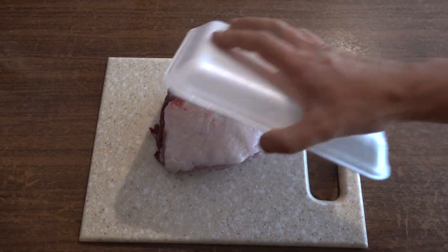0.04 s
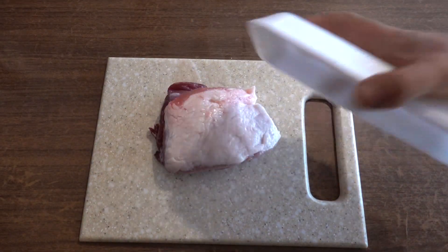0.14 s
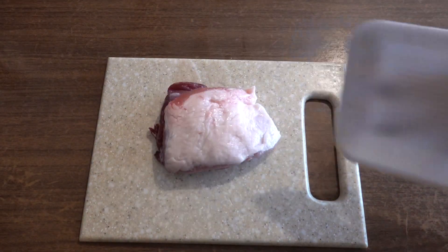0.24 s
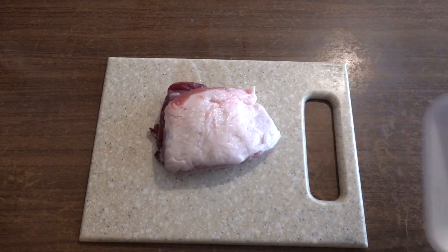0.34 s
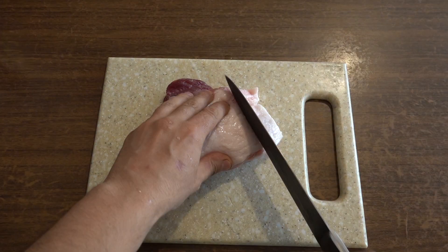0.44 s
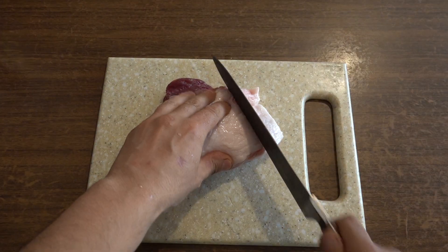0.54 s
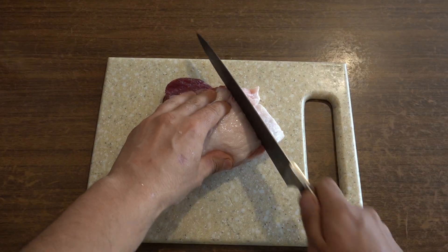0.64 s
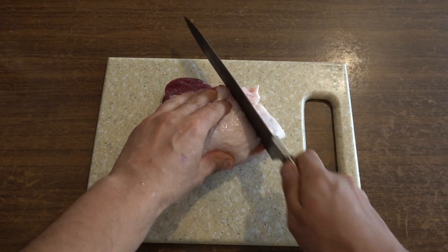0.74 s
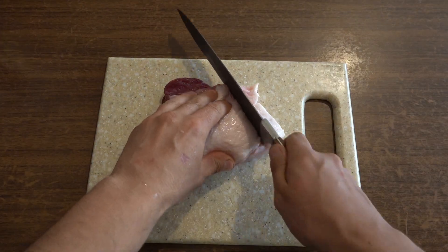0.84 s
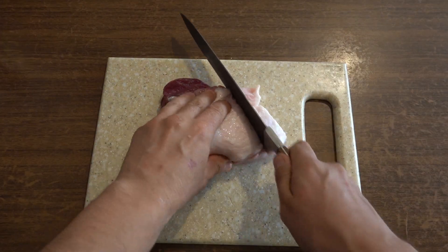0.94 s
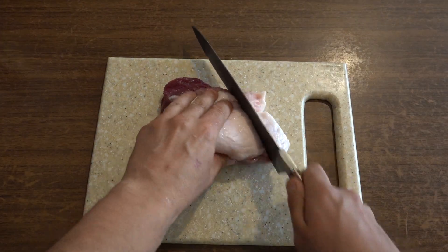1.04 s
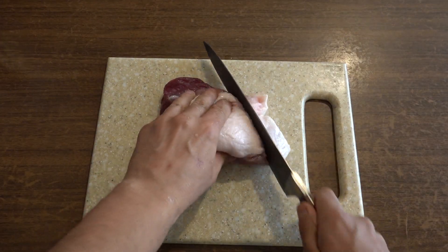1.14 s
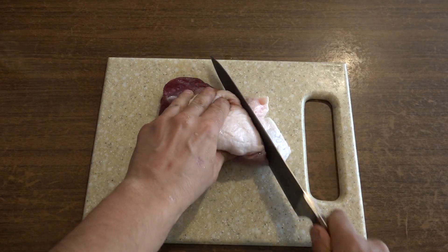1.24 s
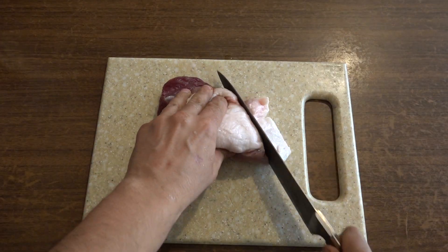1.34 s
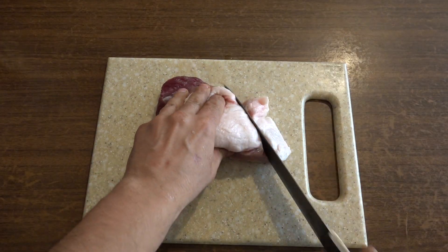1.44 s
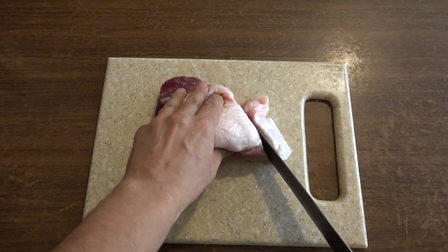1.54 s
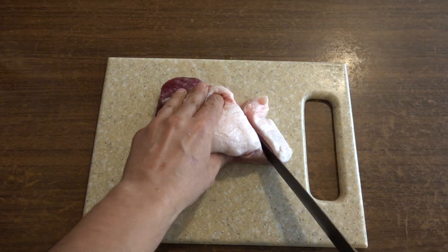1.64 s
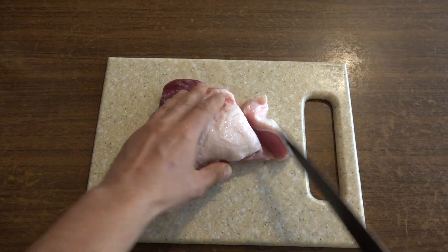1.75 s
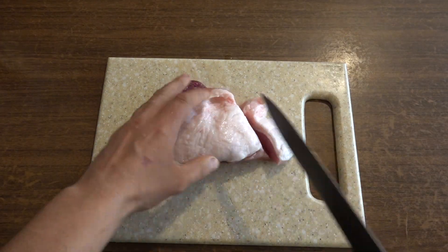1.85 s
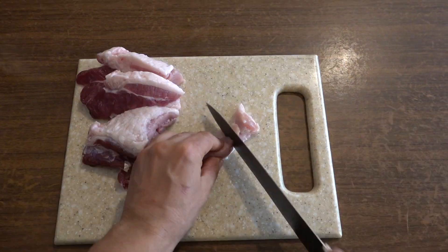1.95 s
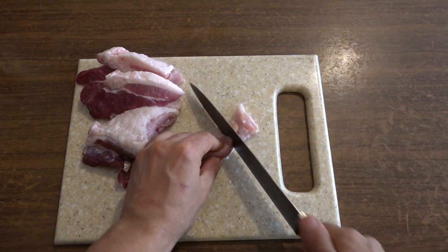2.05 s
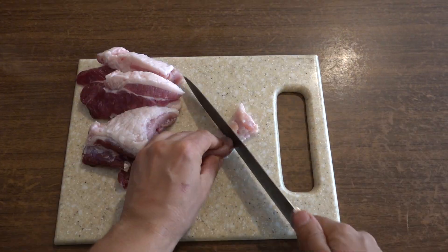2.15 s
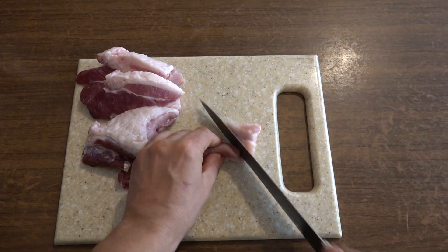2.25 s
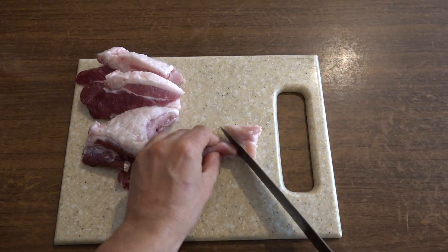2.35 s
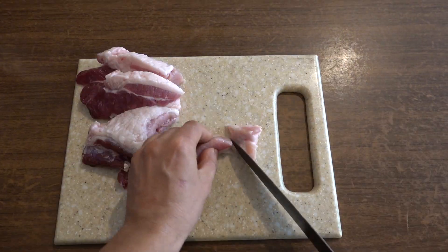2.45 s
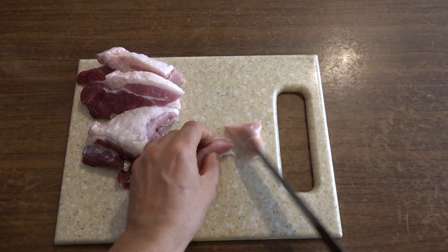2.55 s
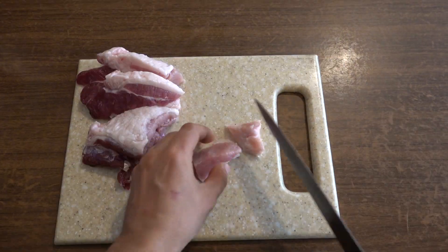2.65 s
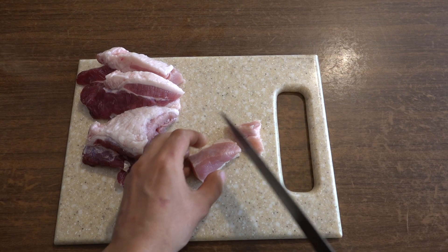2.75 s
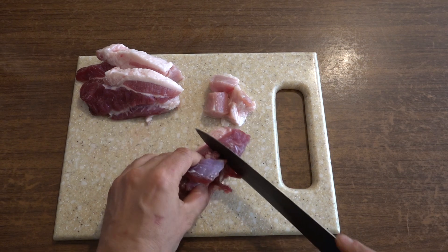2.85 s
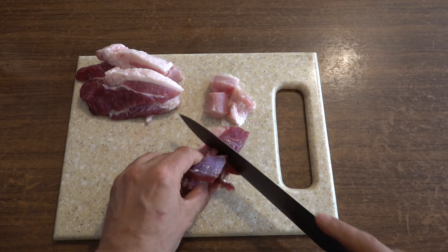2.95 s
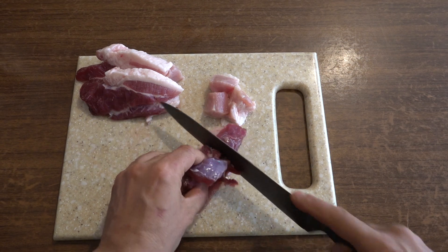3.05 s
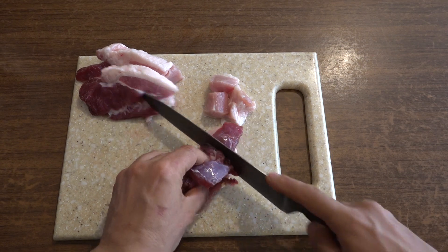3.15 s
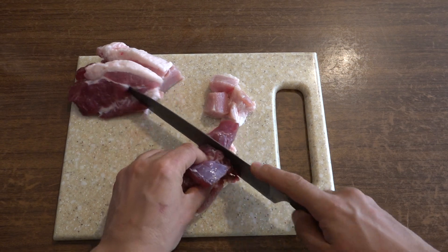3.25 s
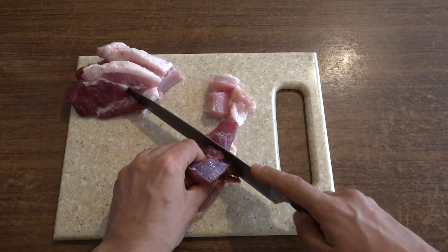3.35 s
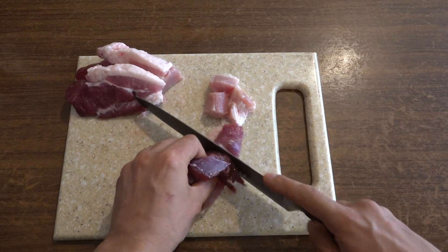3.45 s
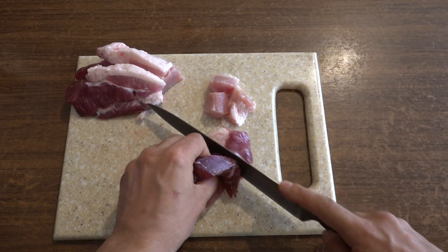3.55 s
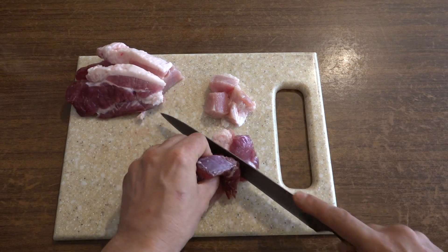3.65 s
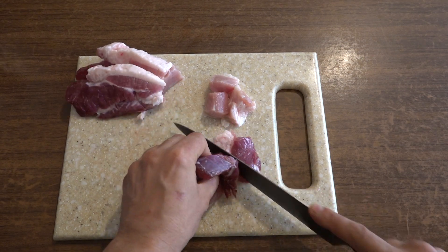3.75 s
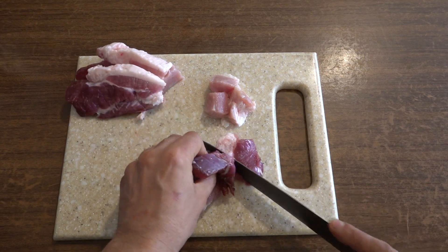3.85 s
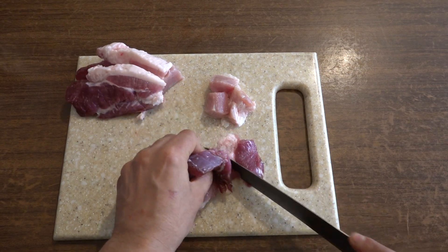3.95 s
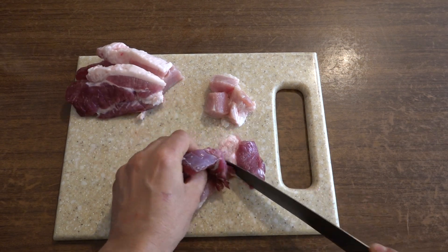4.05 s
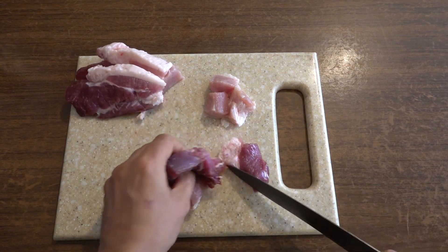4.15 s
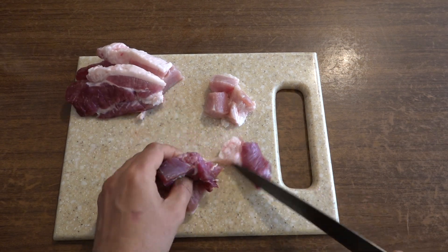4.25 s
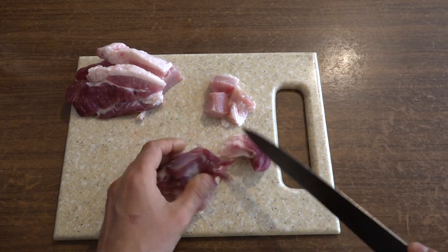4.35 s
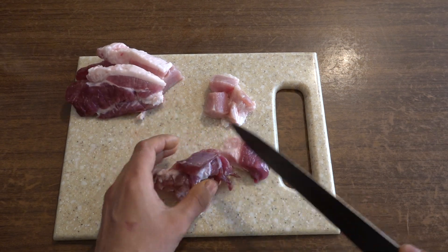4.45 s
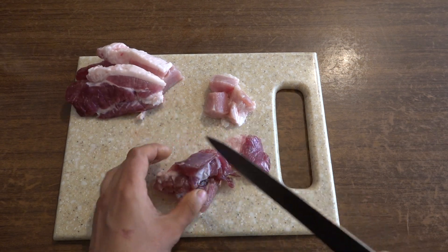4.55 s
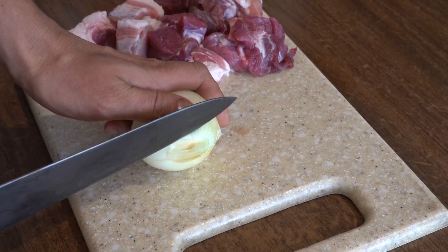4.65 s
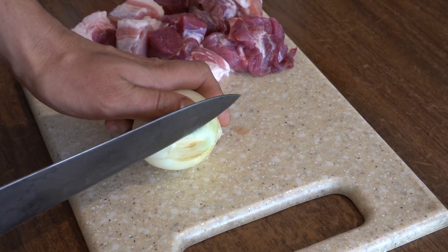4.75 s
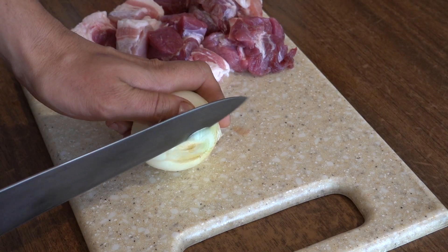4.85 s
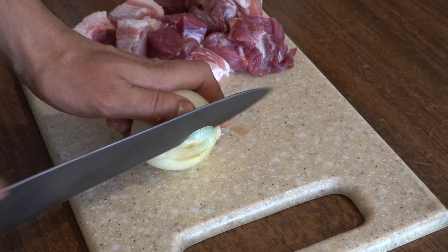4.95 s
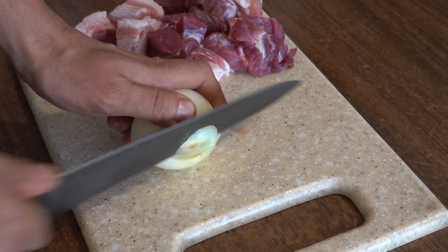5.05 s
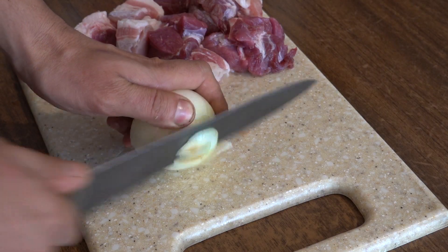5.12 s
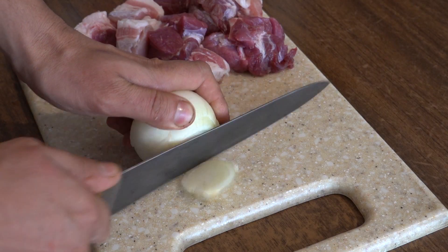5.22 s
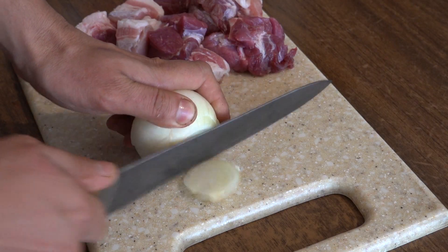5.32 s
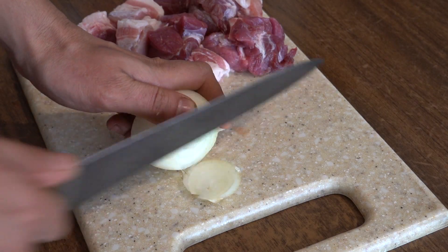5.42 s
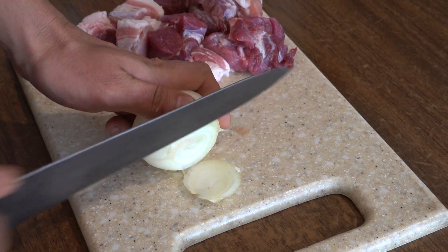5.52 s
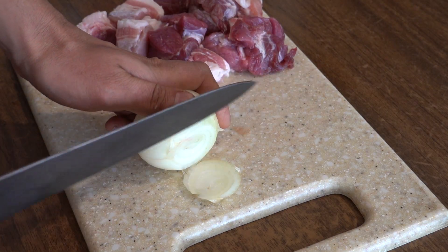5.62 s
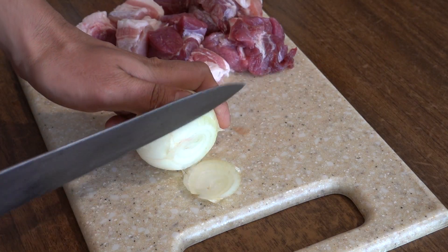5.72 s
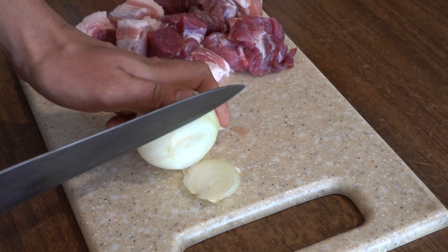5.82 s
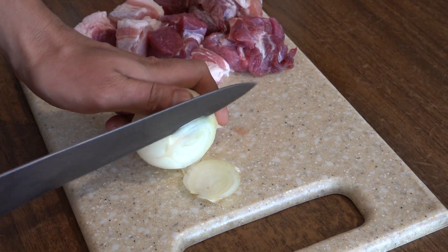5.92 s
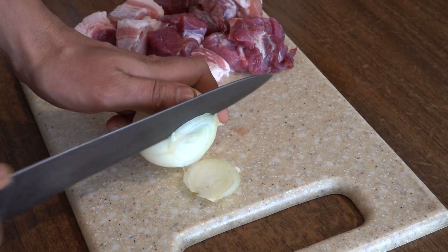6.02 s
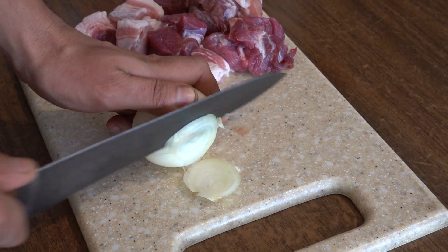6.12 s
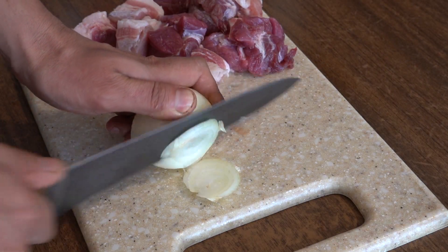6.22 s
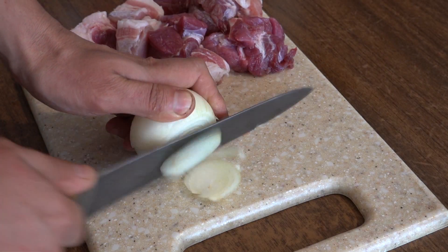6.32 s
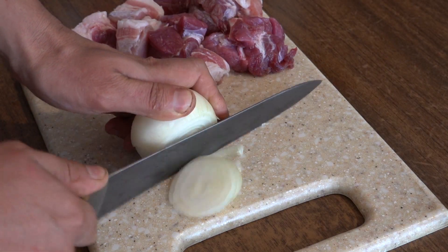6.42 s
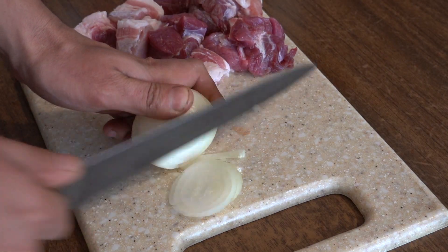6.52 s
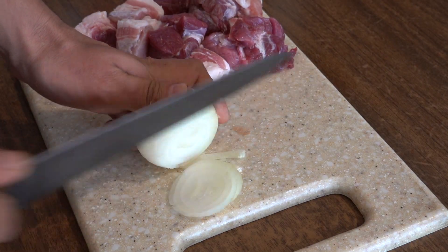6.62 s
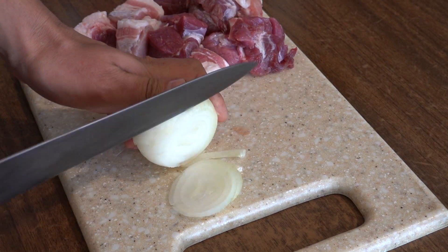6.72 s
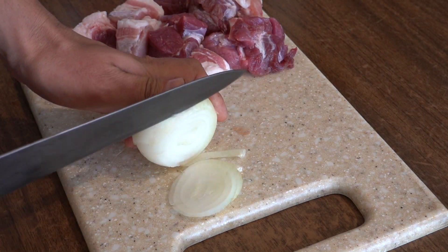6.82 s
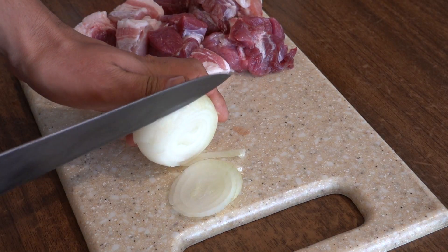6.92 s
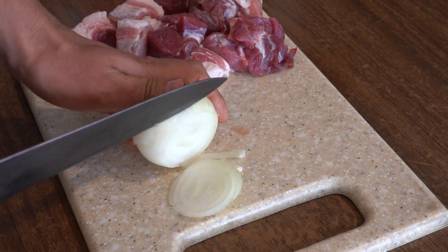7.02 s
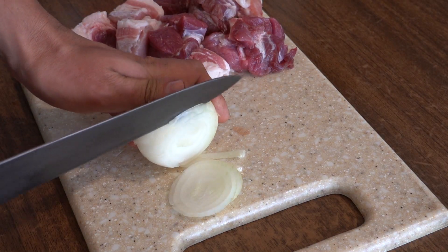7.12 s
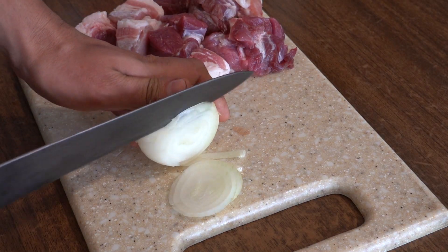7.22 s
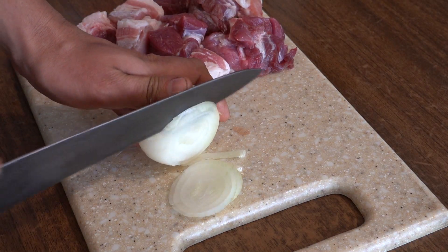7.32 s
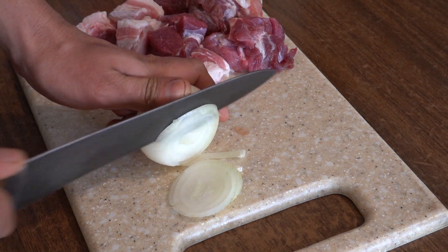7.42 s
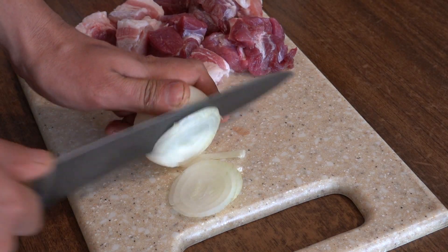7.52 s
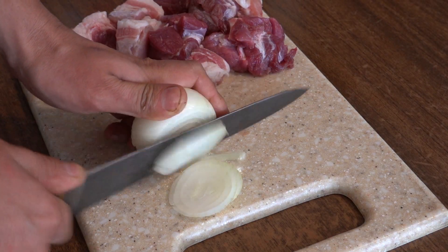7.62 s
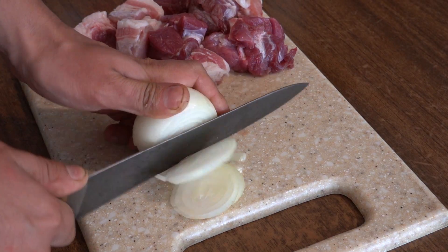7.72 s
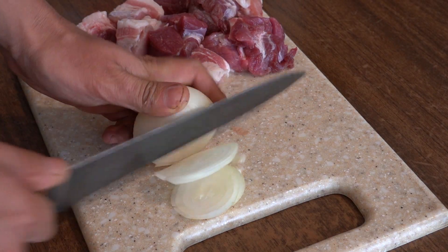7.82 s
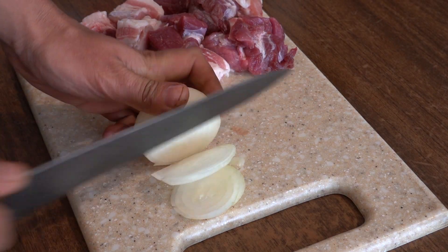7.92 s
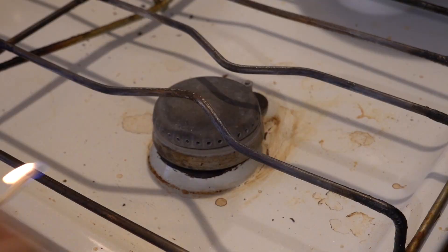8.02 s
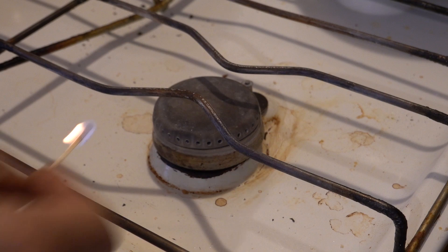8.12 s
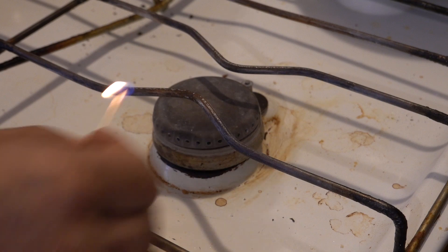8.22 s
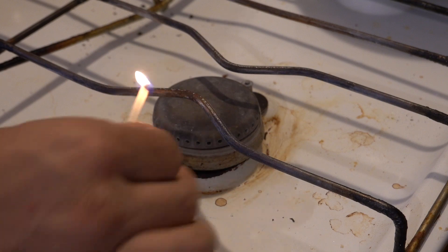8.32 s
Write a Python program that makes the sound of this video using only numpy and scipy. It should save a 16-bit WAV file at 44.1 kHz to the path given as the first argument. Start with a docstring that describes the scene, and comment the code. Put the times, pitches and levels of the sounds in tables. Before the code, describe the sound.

In a ringing kitchen, wet slicing and dull board knocks give way to three swelling onion crunches with hard chops, then near silence over faint hum.

```python
"""In a bare, ringing kitchen, a long knife works on a plastic board on a wooden table. Random tiny slips,
filtered by the blade, scrape through meat; damped bursts make wet ticks and board knocks. Then three strokes
crunch through an onion as ever louder grains, each ending in a loud clack of ringing modes. An appliance hums
throughout as wavering sines; at the end the scene changes to the quiet kitchen."""
import sys
import numpy as np
from scipy import signal
from scipy.fft import rfft, irfft, next_fast_len
from scipy.io import wavfile
from scipy.ndimage import uniform_filter1d

SR = 44100
rng = np.random.default_rng(int(sys.argv[2]) if len(sys.argv) > 2 else 0)


def file_out(sig):
    """Save sig as 16-bit WAV at sys.argv[1]."""
    # one column per channel
    cols = np.atleast_2d(sig).T
    # limit, then scale
    lim = np.clip(cols, -1, 1)
    pcm = np.round(lim * 32767).astype(np.int16)
    wavfile.write(sys.argv[1], SR, pcm)


N = 369116
TIME = np.arange(N) / SR  # s

# Room decay: pitch_hz, t60_s [time to fall 60 dB]
ROOM_T60 = [(100, 1), (250, 0.55), (600, 0.72), (1500, 0.74), (3000, 0.69), (6000, 0.64), (14000, 0.53)]
# Near walls: delay_s, relative_gain
ECHOES = [(.0032, 0.61), (.0062, 0.77), (0.014, 0.58), (0.0228, .45), (.034, 0.28)]
# Left-right likeness of sound from all sides: pitch_hz, likeness [1 = identical]
LIKENESS = [(100, 1), (300, 1), (650, 0.89), (1600, 0.72), (3600, 0.22), (8000, 0.024)]

# Still air, spectrum shape: pitch_hz, relative_db
AIR = [(15, -34.5), (25, -17.5), (44, -12), (76, -9.5), (100, -7.5), (141, -11.5), (330, -11.5), (500, -16),
       (800, -18.5), (1100, -27.5), (2700, -32.5), (4450, -33), (6850, -42), (11000, -42.5), (15800, -62)]
AIR_DB = -70.5
# Appliance hum: pitch_hz, level_db [rms before the waver]
HUM = [(97, -72), (167, -85.5)]
# Faint whine before and after the cutting: pitch_hz, width_hz [of each of two passes], level_db [rms]
WHINE = (675, 25, -77.5)
WHINE_UNTIL_S = 0.52

# Hands shift food on the board: start_s, length_s [until release], level_db [before the stroke eases off]
HANDLING = [(0, 0.043, -62), (0.49, 0.77, -69), (1.196, .17, -59.5), (3.1, 0.1, -68.5),
            (3.711, 0.19, -65.5), (5.788, 0.41, -64.5), (6.2, .6, -71.5), (7.092, 0.061, -64.5),
            (7.48, 0.25, -64)]
# Dull rumble in the table, spectrum shape: pitch_hz, relative_db
RUMBLE = [(60, -35.5), (95, -4.5), (125, 6), (170, -0.5), (280, -7.5), (500, -14.5), (1200, -19),
          (4000, -34.5), (12000, -70.5)]
PRESS_RISE_S, PRESS_RELEASE_DB_PER_S = 0.017, 66.5
# A stroke eases off as it goes, then the blade stops
SAG_DB_PER_S, RELEASE_DB_PER_S = 11.5, 150.5

# Blade squeaks on fat and onion skin:
# start_s, length_s, from_hz, to_hz, width_hz [of each of two passes], level_db [before fades and room]
SQUEAKS = [(0.508, 0.079, 4600, 4640, 600, -74), (0.812, 0.073, 2600, 3630, 700, -77),
           (0.859, 0.54, 2320, 2320, 149, -72.5), (1.095, 0.025, 1940, 4800, 224, -53),
           (1.46, 0.27, 2640, 4270, 1510, -55), (1.598, 0.12, 4270, 5970, 1000, -56.5),
           (2.288, 0.25, 3800, 3600, 1310, -55), (3.893, 0.12, 2190, 2230, 400, -59),
           (7.082, 0.16, 3170, 3280, 250, -72.5), (7.342, 0.16, 3080, 3220, 350, -65.5)]

# Slicing strokes through meat: start_s, length_s [until release], rise_s,
# scrape_db, fizz_db [relative, trimmed in the mix], blade_ring_db [relative to the scrape]
SLICES = [(0.517, 0.4, 0.064, -78.5, -77, -25), (1.047, .31, .015, -65, -71.5, -34),
          (1.361, 0.16, 0.023, -57.5, -79, -6), (1.503, .21, 0.026, -55, -68, -17),
          (1.99, 0.065, 0.013, -73, -80, -11), (2.136, 0.017, 0.016, -56.5, -75.5, -12),
          (2.213, 0.19, 0.14, -48.5, -60, -5.5), (3.883, .30, .05, -55.5, -77.5, -2.5)]
# Scrape, spectrum shape: pitch_hz, relative_db
SCRAPE = [(290, -5.5), (650, -4.5), (1000, -3.5), (1550, -1), (2300, -0.5), (2900, -3.5), (3750, -5.5),
          (5000, -13), (6700, -17), (11000, -32), (15000, -36)]
# Blade resonances: pitch_hz, width_hz, relative_db
BLADE = [(1500, 23, 3.5), (1953, 61, 11), (2284, 58, 5), (3785, 68, 13), (4370, 96, 0), (4830, 79, -8),
         (5930, 77, -8.5)]
# Wet flesh, spectrum shape: pitch_hz, relative_db
FIZZ = [(2000, -18.5), (6000, 1.5), (10500, 0.5), (15500, -2)]

# Wet meat ticks as it parts from the steel: start_s, peak_db [before trim and room], pitch_hz, ring_s [decay constant]
TICKS = [(1.022, -56.5, 1090, 0.0028), (1.0686, -31, 9900, 0.00013), (1.489, -50.5, 6900, .0005),
         (1.8, -55, 8400, 0.00037), (2.8492, -50, 5000, 0.00046), (3, -47, 7750, .0005),
         (3.2555, -47.5, 4300, 0.0004), (3.2666, -49.5, 9200, 0.00038), (3.3755, -49.5, 6670, 0.0014),
         (3.626, -50, 6730, 0.0014), (3.7592, -50.5, 6800, 0.0011), (4.212, -54, 8000, 0.00051),
         (4.262, -52, 6900, 0.00061)]
# Spit in each tick, spectrum shape: pitch_hz, relative_db
SPIT = [(1000, -6.5), (3000, 2.5), (7000, 0.5), (12000, 0.5), (13500, -15), (16000, -32)]

# Knife knocks on the board: start_s, crack_db, dull_above_hz, hollow_db [modes below 550 Hz, relative],
# long_ring_db [relative to the crack, before the shared ring gain], room_db [relative to the crack]
KNOCKS = [(1.9682, -11, 3450, 4, -17, 0), (1.9958, -17.5, 1900, -2, -14, -5),
          (2.1455, -22, 1390, -3, -7, -4.5), (2.2512, -12.5, 3600, 3, -23, -2),
          (2.5892, -8.5, 4740, -2.5, -1.5, 2.5), (2.8485, -24.5, 1750, 1.5, -2, 7.5),
          (4.3292, -9, 3720, -1.5, -1.5, 1), (4.6728, -10.5, 2370, 5, -27, -1.5),
          (4.701, -25.5, 2950, 5, -16, 0.5)]
# Board cracks under the edge, quickly damped: pitch_hz, relative_db [before short modes are raised], t60_s
KNOCK_MODES = [(70, -13, 0.038), (154.8, -3.5, 0.065), (341, -2, 0.057), (452.6, -0.5, 0.066),
               (754, -4, 0.033), (923, -2.5, 0.042), (1230, -4.5, 0.011), (1572, -4, 0.014),
               (1962, -2, 0.0089), (2485, -4.5, .01), (3310, -3.5, 0.003), (5070, -14.5, 0.002)]
# Board and table ring together: pitch_hz, relative_db, t60_s
TABLE_MODES = [(63.5, -46, 0.39), (101.1, -26, 0.25), (115.1, -34.5, 0.5), (135.3, -45, 0.15),
               (191, -58, 0.31), (246.5, -38.5, 0.3), (312, -41, 0.18), (412, -42, 0.34), (441, -37, 0.33),
               (632, -39.5, 0.26), (956, -53.5, .25)]
# Table thumps softly as it gives under the hand: start_s, pitch_hz, level_db [before swell and decay], t60_s
THUMPS = [(1.972, 143.5, -46.5, 0.86), (2.255, 129.3, -44.5, 0.51), (2.859, 139, -41.5, 0.32),
          (4.678, 151, -52, 0.63), (5.902, 152.7, -52.5, 0.4), (5.992, 124, -45.5, 0.27),
          (7.15, 125.5, -61, .4)]

STICKY_FROM_S, STICKY_TO_S, STICKY_DB = 2.85, 4.4, -86  # wet pieces are pulled apart; rms dB before gating

# Steady, humming rush while the onion is cut, spectrum shape: pitch_hz, relative_db
RUSH = [(50, -22.5), (80, -9), (97, 20), (120, 0.5), (200, 3), (600, -6), (1000, -2.5), (1290, 7.5),
        (1600, -11), (2100, -2.5), (2700, -26), (5000, -28), (12000, -30), (14000, -17), (15000, -41)]
RUSH_DB, ONION_FROM_S, ONION_TO_S = -64, 4.672, 8.022

# Cuts through the onion: skin_gives_s, board_reached_s, skin_db, board_db [both relative, trimmed in the mix]
CUTS = [(4.844, 5.253, -82, -56.5), (5.912, 6.381, -74.5, -51.5), (7.076, 7.672, -80.5, -47.5)]
# Bursting and tearing onion, spectrum shape: pitch_hz, relative_db
CRUNCH = [(290, -36), (500, -26.5), (687, -29.5), (760, -23), (1260, -14), (1500, -11), (2420, -7),
          (3040, 0.5), (3950, 0), (8990, -3.5), (10700, -4.5), (15800, -9.5)]
BITE_S = 0.015  # the edge enters the skin
PEEL_DB, PEEL_S, PEEL_FADE_DB_PER_S = -65, 0.1, 212  # the slice peels off the blade; dB before the mix trim
# Whole onion layers snap: start_s, level_db [before the shared snap gain, rise and fade]
SNAPS = [(4.8894, -51.5), (5.0704, -50), (5.1038, -57), (5.2235, -32), (5.899, -51.5), (5.9484, -49.5),
         (6.126, -39.5), (6.2861, -42), (6.321, -39), (6.376, -35.5), (7.1004, -52.5), (7.1876, -52),
         (7.3662, -51), (7.4375, -41), (7.5433, -45), (7.6684, -28), (7.7584, -37)]
SNAP_DB, SNAP_RISE_S, SNAP_FADE_S = -9.5, 0.003, 0.013

# Blade breaks through the onion and lands on the board: start_s, crack_db, dull_above_hz, hollow_db
# [modes below 550 Hz, relative], long_ring_db [relative, before the shared ring gain], room_db [relative]
CHOPS = [(5.2372, -10.5, 6500, 0, 0.5, 8.4), (6.3868, -11, 6660, -1.2, 0, 12.05),
         (7.6785, -12, 7000, -0.94, 0.5, 12.5), (7.747, -12, 6500, -0.24, -27, 8.2),
         (7.771, -16.5, 1800, -1, -18, 2)]
# Blade and board clack together: pitch_hz, relative_db [before short modes are raised], t60_s
CHOP_MODES = [(243, -3, 0.025), (470, -8, 0.029), (632, -10.5, .04), (1031, -7.5, 0.015),
              (1465, -0.5, 0.028), (1720, 1, 0.0091), (1965, 0.5, 0.021), (2136, -3.5, 0.023),
              (2364, -1, 0.025), (2559, -2.5, 0.021), (3500, -5.5, 0.0099), (3794, -9.5, 0.075),
              (4120, -11.5, 0.018), (5570, -15.5, 0.0052), (6200, -21.5, 0.0116)]
# Board booms on under the long edge: pitch_hz, relative_db, t60_s
BOARD_MODES = [(100.5, -57.5, 0.64), (183, -57.5, 0.86), (216.6, -53, 0.79), (236.5, -38, 0.48),
               (273, -37.5, 0.31), (325.5, -39.5, 0.56), (381, -44, 0.44), (625, -57.5, 0.27),
               (1387, -49, 0.54), (1480, -57, 0.18), (1562, -42, 0.52), (1870, -45.5, 0.14),
               (2040, -55.5, 0.46), (2550, -58.5, 0.68)]

EDGE_HZ = 15900  # upper limit of the sound


def amp(db):
    """Turns decibels into gain."""
    return 10 ** (np.asarray(db) / 20)


def unit(x):
    """Scales to rms 1."""
    return x / np.sqrt(np.mean(x ** 2) + 1e-20)


def band_unit(x, band_hz):
    """Scales so that one band of the left-right average has rms 1."""
    sos = signal.butter(4, band_hz, "band", fs=SR, output="sos")
    return x / signal.sosfilt(sos, x.mean(0)).std()


def read(points, hz):
    """Reads a table on a log-frequency axis."""
    f, value = np.transpose(points)
    return np.interp(np.log(hz + 1), np.log(f + 1), value)


def add(mix, start_s, sound):
    """Mixes a sound in at its start time."""
    part = mix[..., max(round(start_s * SR), 0):][..., :sound.shape[-1]]
    part += sound[..., :part.shape[-1]]


def colour(x, points):
    """Filters by a spectrum in dB."""
    size = next_fast_len(x.shape[-1])
    gain = amp(read(points, np.fft.rfftfreq(size, 1 / SR)))
    return irfft(rfft(x, size) * gain, size)[..., :x.shape[-1]]


def peak(x, hz, width_hz):
    """A fixed resonance of gain 1."""
    return signal.lfilter(*signal.iirpeak(hz, hz / width_hz, fs=SR), x)


def resonate(x, hz, width_hz):
    """A resonance of gain 1 that glides: shift the pitch curve to zero, smooth, shift back."""
    turn = np.exp(2j * np.pi * np.cumsum(hz) / SR)
    r = np.exp(-np.pi * width_hz / SR)
    smooth = signal.lfilter([1 - r], [1, -r], x / turn + 1e-18)
    return 2 * (turn * smooth).real


def ripple(x, depth_db, count=190):
    """The many close modes of a thin blade cut fixed peaks and valleys into whatever passes through it."""
    hz = np.linspace(0, EDGE_HZ, count)
    return colour(x, np.transpose([hz, depth_db * rng.standard_normal(count)]))


def diffuse(size):
    """White noise from all sides at two close microphones: alike in the bass, unrelated in the treble."""
    full = next_fast_len(size)
    mid, side = rfft(rng.standard_normal((2, full)))
    same = np.clip(read(LIKENESS, np.linspace(0, SR / 2, len(mid))), -1, 1)
    mid = mid * np.sqrt((1 + same) / 2)
    side = side * np.sqrt((1 - same) / 2)
    return irfft([mid + side, mid - side], full)[:, :size]


def grains(per_s, spread_db, clump_db, scatter):
    """Tiny clicks of uneven size that come in clumps, each from a slightly different side."""
    size = amp(spread_db * np.minimum(rng.exponential(1, N), 4)) * rng.choice([-1, 1], N)
    clumps = amp(clump_db * unit(uniform_filter1d(rng.standard_normal(N), size=180)))
    clicks = size * clumps * (rng.random(N) < per_s / SR)
    side = scatter * rng.standard_normal(N)
    return unit(clicks * np.array([1 + side, 1 - side]))


def stroke(start_s, length_s, rise_s, release_db_per_s):
    """Gain of one movement of the hand: it builds, eases off slowly and is released."""
    t = np.maximum(TIME - start_s, 0)
    fall_db = SAG_DB_PER_S * t + release_db_per_s * np.maximum(t - length_s, 0)
    return np.minimum(t / rise_s, 1) * amp(-fall_db)


def catching(depth_db, per_s):
    """Gain of an edge that catches and slips at random."""
    knots = np.arange(0, TIME[-1], 1 / per_s)
    return unit(amp(depth_db * np.interp(TIME, knots, rng.standard_normal(len(knots)))))


def kitchen(build_s=0.0059):
    """The room's answer to a click: a few near walls, then a dense tail that decays at its own rate per pitch."""
    hz, t, z = signal.stft(diffuse(SR), SR, nperseg=256)
    fall = np.exp(-np.log(1000) * t / read(ROOM_T60, hz)[:, None])
    tail = signal.istft(z * fall, SR, nperseg=256)[1][:, :SR]
    tail = tail * (1 - np.exp(-TIME[:SR] / build_s))
    tail /= np.linalg.norm(tail[0])
    for delay_s, gain in ECHOES:
        add(tail, delay_s, 0.14 * gain * np.ones(1))
    return tail


def in_room(x, room, wet_db):
    """Direct sound plus the room, scaled to keep about the same power."""
    wet = signal.oaconvolve(x, room, axes=1)[:, :N]
    return (x + amp(wet_db) * wet) / np.hypot(1, amp(wet_db))


def background(waver=0.15):
    """Still air as shaped noise, and an appliance's hum as sines that waver slightly in level and phase."""
    knots = np.linspace(0, TIME[-1], num=60)
    hum = 0
    for hz, level_db in HUM:
        drift, swell = (np.interp(TIME, knots, rng.standard_normal(len(knots))) for _ in range(2))
        tone = np.sqrt(2) * np.sin(2 * np.pi * hz * TIME + 0.33 * drift)
        hum = hum + amp(level_db) * (1 + waver * swell) * tone
    return hum + amp(AIR_DB) * unit(colour(diffuse(N), AIR))


def whine():
    """A narrow, unsteady tone in the air of the kitchen: noise through two equal resonances."""
    hz, width_hz, level_db = WHINE
    heard = uniform_filter1d(1. * ((TIME < WHINE_UNTIL_S) | (TIME > ONION_TO_S)), size=400)
    tone = unit(peak(peak(diffuse(N), hz, width_hz), hz, width_hz))
    return amp(level_db) * tone * heard


def handling():
    """Hands and food press and roll on the board: a dull rumble in the table."""
    pressure = 0
    for start_s, length_s, level_db in HANDLING:
        pressure = pressure + amp(level_db) * stroke(start_s, length_s, PRESS_RISE_S, PRESS_RELEASE_DB_PER_S)
    return unit(colour(diffuse(N), RUMBLE)) * pressure


def squeaks(room):
    """Steel sticks and slips on the food: a rough whistle that glides with the stroke."""
    out = np.zeros((2, N))
    for start_s, length_s, from_hz, to_hz, width_hz, level_db in SQUEAKS:
        size = int(length_s * SR)
        glide = np.geomspace(from_hz, to_hz, size)
        whistle = resonate(rng.standard_normal(size), glide, width_hz)
        whistle = unit(resonate(whistle, glide, width_hz))
        add(out, start_s, amp(level_db) * whistle * np.hanning(size))
    return in_room(out, room, wet_db=-9.5)


def slicing(room):
    """The edge drags through meat and over the board: fine slips ring the blade, the wet flesh fizzes."""
    slips = grains(per_s=9000, spread_db=1.5, clump_db=1.4, scatter=0.27)
    steel = unit(sum(amp(db) * peak(slips, hz, width_hz) for hz, width_hz, db in BLADE))
    drag = unit(ripple(colour(slips, SCRAPE), depth_db=5.5))
    wet = grains(per_s=4000, spread_db=1.8, clump_db=2.5, scatter=0.66)
    fizz = unit(ripple(colour(wet, FIZZ), depth_db=-0.5))
    out = np.zeros((2, N))
    for start_s, length_s, rise_s, scrape_db, fizz_db, ring_db in SLICES:
        scrape = band_unit(drag + amp(ring_db) * steel, (1500, 6000))
        layers = amp(scrape_db - 2.5) * scrape + amp(fizz_db + 0.5) * fizz
        out += layers * stroke(start_s, length_s, rise_s, RELEASE_DB_PER_S)
    return in_room(out * catching(depth_db=2.0, per_s=45), room, wet_db=-5)


def ticks(room, spit_db=1):
    """A wet film lets go: a few quickly damped cycles and a little spit."""
    out = np.zeros((2, N))
    t = np.arange(1024) / SR
    for start_s, peak_db, hz, ring_s in TICKS:
        spit = unit(colour(rng.standard_normal((2, len(t))), SPIT))
        tick = np.sin(2 * np.pi * hz * t) + amp(spit_db) * spit
        tick = tick * np.sqrt(t) * np.exp(-t / ring_s)
        add(out, start_s, amp(peak_db + 0.5) * tick / abs(tick).max())
    return in_room(out, room, wet_db=-8.0)


def ring_of(modes, gains):
    """Damped modes struck at once; neighbours swing in opposite senses."""
    t = TIME[:SR]
    out = np.zeros(SR)
    for k, ((hz, db, t60), gain) in enumerate(zip(modes, gains)):
        decay = np.exp(-np.log(1000) * t / t60)
        out += (-1) ** k * gain * amp(db) * decay * np.sin(2 * np.pi * hz * t)
    return out


def crack_of(modes, dull_hz, hollow_db, grit_db, thin_hz, grit_s=0.0051, grit_hz=6000):
    """The first sound of a blow, of energy 1: short modes and contact grit, dulled by a soft contact."""
    hz, _, t60 = np.transpose(modes)
    body = unit(ring_of(modes, amp(hollow_db * (hz < 550)) / np.sqrt(t60)))
    grit = rng.standard_normal((2, SR)) * np.exp(-TIME[:SR] / grit_s)
    grit = unit(signal.lfilter(*signal.butter(1, grit_hz, fs=SR), grit))
    band = signal.butter(2, [thin_hz, min(dull_hz, SR / 3)], "band", fs=SR, output="sos")
    crack = signal.sosfilt(band, (body + amp(grit_db) * grit)[:, :8192])
    return crack / np.linalg.norm(crack[0])


def blows(rows, short_modes, long_modes, room, ring_db, swell_s, grit_db, thin_hz):
    """Each blow is a crack that fills the room, and a slower swell of the long modes below the blade."""
    out = np.zeros((2, N))
    ring = ring_of(long_modes, np.ones(len(long_modes))) * (1 - np.exp(-TIME[:SR] / swell_s))
    for start_s, crack_db, dull_hz, hollow_db, long_db, wet_db in rows:
        crack = amp(crack_db) * crack_of(short_modes, dull_hz, hollow_db, grit_db, thin_hz)
        add(out, start_s, crack)
        add(out, start_s, amp(wet_db) * signal.fftconvolve(crack[:1], room, axes=1))
        add(out, start_s, amp(crack_db + long_db + ring_db) * ring)
    return out


def thumps(swell_s=0.019):
    """One low mode of the table swells and dies; its pitch depends on where the hand bears down."""
    out = np.zeros(N)
    for start_s, hz, level_db, t60 in THUMPS:
        add(out, start_s, ring_of([(hz, level_db, t60)], [1]) * (1 - np.exp(-TIME[:SR] / swell_s)))
    return out


def stickiness(room):
    """Wet pieces of meat part under the fingers with a faint, sparse crackle."""
    pops = unit(colour(grains(per_s=120, spread_db=1.5, clump_db=2.0, scatter=0.43), FIZZ))
    heard = (TIME > STICKY_FROM_S) * (TIME < STICKY_TO_S)
    return in_room(amp(STICKY_DB) * pops * heard, room, wet_db=-4)


def rush():
    """A steady, humming rush: noise from all sides with strong low and middle peaks."""
    return amp(RUSH_DB) * unit(colour(diffuse(N), RUSH))


def cut(skin_s, board_s, skin_db, board_db):
    """Gain of one cut: it swells evenly in dB as the edge sinks, then turns to peeling at the board."""
    depth = np.clip((TIME - skin_s) / (board_s - skin_s), 0, 1)
    bite = np.clip((TIME - skin_s) / BITE_S, 0, 1)
    sinking = bite * amp(skin_db + (board_db - skin_db) * depth)
    peeling = amp(PEEL_DB - PEEL_FADE_DB_PER_S * np.maximum(TIME - board_s - PEEL_S, 0))
    return np.where(TIME < board_s, sinking, peeling)


def crunch(room):
    """Cells burst ever louder as the edge sinks; now and then a whole layer gives way."""
    bursts = grains(per_s=3200, spread_db=0.5, clump_db=2.45, scatter=0.5)
    cells = band_unit(colour(bursts, CRUNCH), (7500, 15000))
    cells *= catching(depth_db=1.5, per_s=61) * sum(cut(*row) for row in CUTS)
    t = TIME[:SR]
    snap = np.minimum(t / SNAP_RISE_S, 1) * np.exp(-t / SNAP_FADE_S)
    layers = np.zeros(N)
    for start_s, level_db in SNAPS:
        add(layers, start_s, amp(level_db + SNAP_DB) * snap)
    tear = unit(colour(grains(per_s=4800, spread_db=3.0, clump_db=-1.5, scatter=0.4), CRUNCH))
    return in_room(amp(-3.5) * cells + tear * layers, room, wet_db=-12)


def scene():
    """Meat first, then the onion with its steady rush; at the end the scene changes to the quiet kitchen, where
    the faint whine returns."""
    room = kitchen()
    meat = squeaks(room) + slicing(room) + ticks(room) + stickiness(room)
    meat += blows(KNOCKS, KNOCK_MODES, TABLE_MODES, room, ring_db=9, swell_s=0.031, grit_db=-11, thin_hz=45)
    onion = rush() + ripple(crunch(room), depth_db=1.0)
    onion += blows(CHOPS, CHOP_MODES, BOARD_MODES, room, ring_db=11.5, swell_s=0.019, grit_db=-22.5, thin_hz=202)
    present = uniform_filter1d(1. * (TIME > ONION_FROM_S) * (TIME < ONION_TO_S), size=100)
    return background() + whine() + handling() + meat + thumps() + onion * present


def record(dry):
    """A steep low-pass removes the highest treble."""
    taps = signal.firwin(511, EDGE_HZ, window=("kaiser", 9), fs=SR)
    return signal.oaconvolve(dry, taps[None], "same")


dry = scene()
out = record(dry)
file_out(out)
```